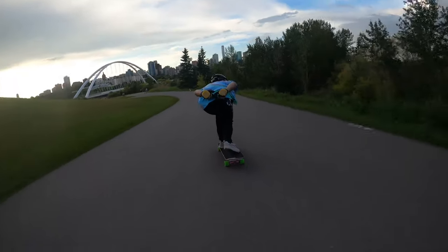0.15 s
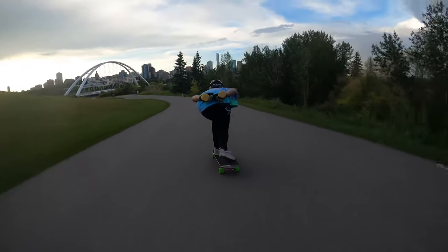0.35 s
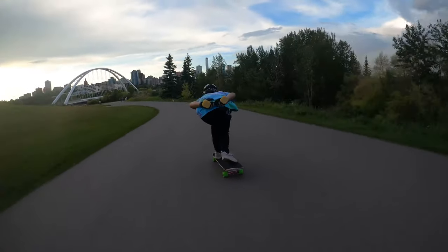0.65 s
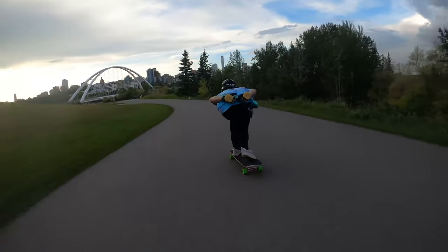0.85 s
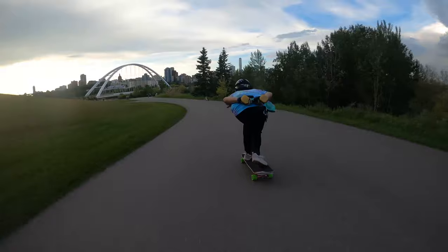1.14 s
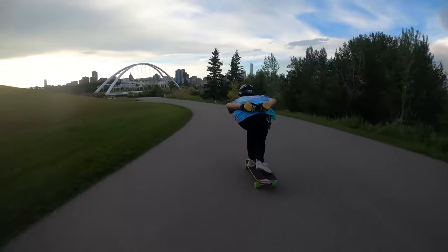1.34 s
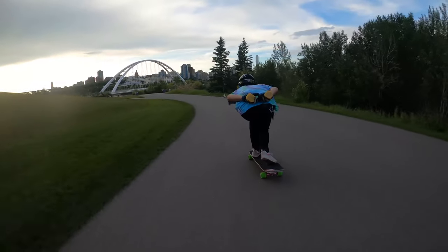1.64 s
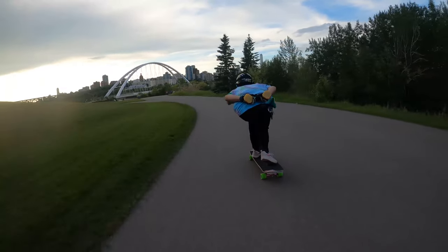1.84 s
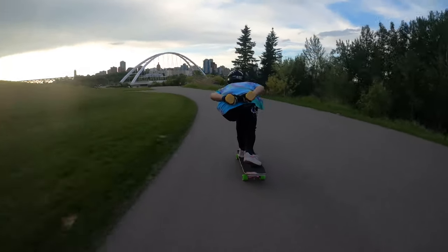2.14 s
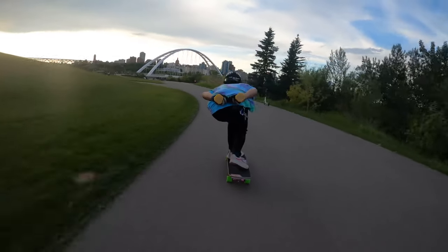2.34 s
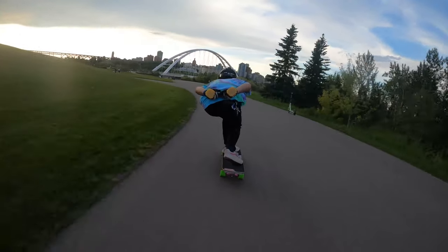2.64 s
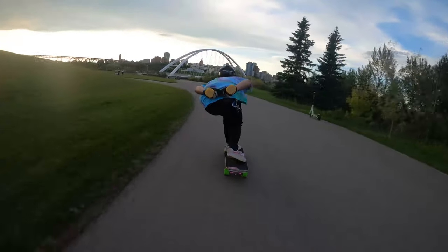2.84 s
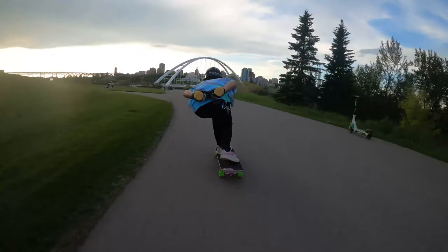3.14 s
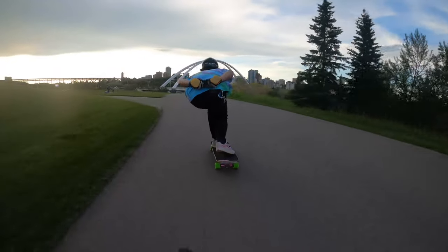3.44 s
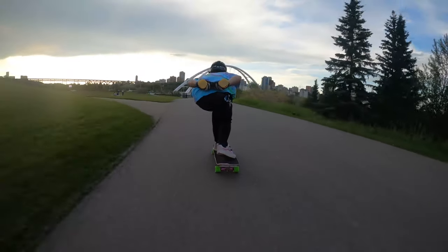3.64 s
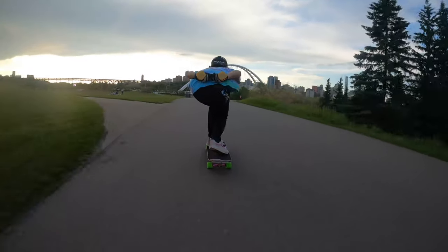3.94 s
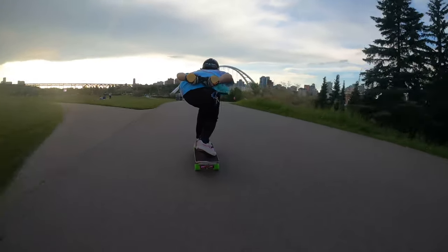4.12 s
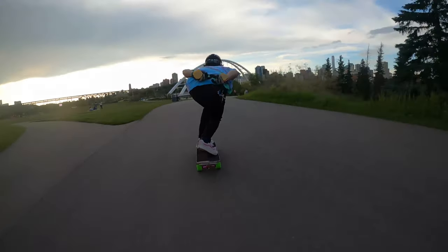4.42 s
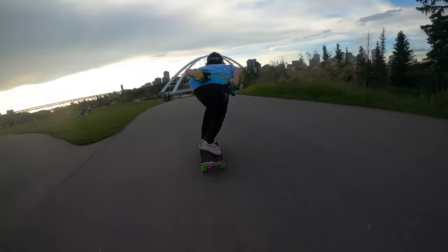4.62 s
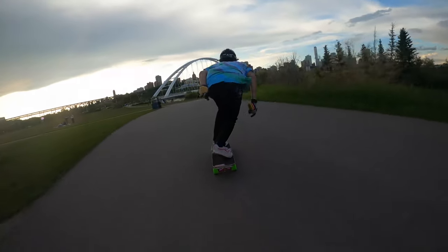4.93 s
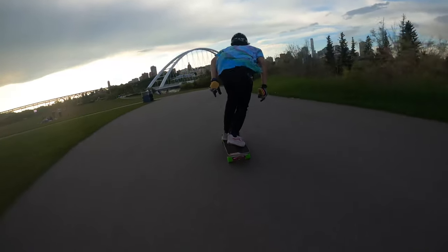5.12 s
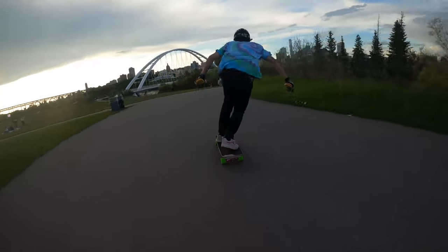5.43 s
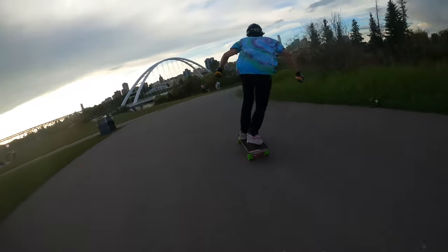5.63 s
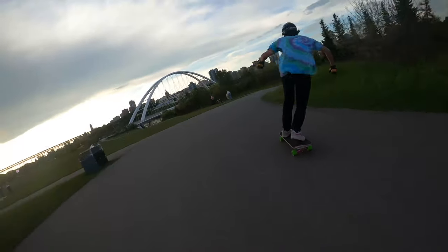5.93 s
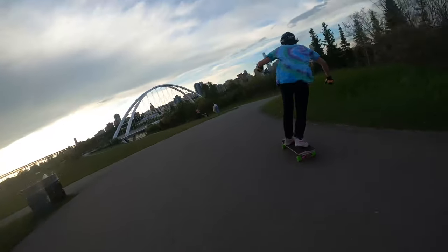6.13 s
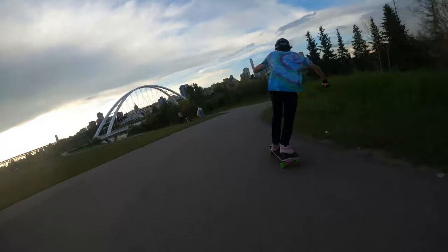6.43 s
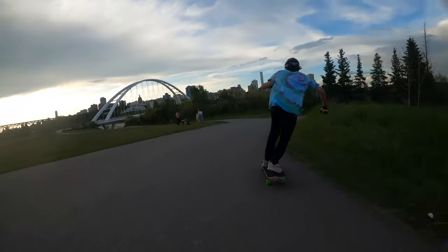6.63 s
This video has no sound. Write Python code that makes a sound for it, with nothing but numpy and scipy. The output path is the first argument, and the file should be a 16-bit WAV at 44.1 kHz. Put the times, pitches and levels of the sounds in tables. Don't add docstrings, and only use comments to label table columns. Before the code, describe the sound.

Longboard wheels drone steadily over asphalt just ahead, with gritty tread hiss and faint sand ticks, while wind thumps and buffets the moving microphone.

```python
import sys
import numpy as np
from scipy import signal
from scipy.fft import rfft, irfft, next_fast_len
from scipy.io import wavfile
from scipy.ndimage import uniform_filter1d, map_coordinates

SR = 44100
rng = np.random.default_rng(int(sys.argv[2]) if len(sys.argv) > 2 else 0)


def int16_out(signal):
    q = np.round(np.clip(np.atleast_2d(signal).T, -1, 1) * 32767)
    wavfile.write(sys.argv[1], SR, q.astype(np.int16))


def boost_factor(decibels):
    exponent = np.asarray(decibels, float) / 20
    return 10 ** exponent


N = 298557
TIME = np.arange(N) / SR


def unit(x):
    return x / np.sqrt(np.mean(x ** 2) + 1e-20)


def along(points, hz):
    point_hz, value = np.transpose(points)
    return np.interp(np.log(hz + 1), np.log(point_hz + 1), value)


def curves(rows):
    seconds, *columns = np.transpose(rows)
    return [np.interp(TIME, seconds, column) for column in columns]


def wobble(rate):
    knots = rng.standard_normal(int(N * rate / SR) + 4)
    return map_coordinates(knots, [np.arange(N) * rate / SR])


def swells(rows, base_db):
    power = boost_factor(base_db) ** 2
    for start, db, half in rows:
        power = power + boost_factor(db) ** 2 * np.exp(-2 * ((TIME - start) / half) ** 2)
    return 10 * np.log10(power)


def filtered(x, response):
    size = next_fast_len(N + 8192)
    spectrum = rfft(x, size) * response(np.fft.rfftfreq(size, 1 / SR))
    return irfft(spectrum, size)[..., :N]


def shape(points):
    return lambda hz: boost_factor(along(points, hz)) * (hz > points[0][0]) * (hz < points[-1][0])


def modes(table):
    def response(hz):
        total = 0
        for k, (centre, width, db) in enumerate(table):
            ring = 1j * hz * width / (centre * centre - hz * hz + 1j * hz * width)
            total = total + (-1) ** k * boost_factor(db) * ring
        return total
    return response


def patchy(patchy_db):
    bins = signal.stft(rng.standard_normal((2, N)), nperseg=512)[2]
    field = uniform_filter1d(rng.standard_normal(bins.shape[1:]), size=6, axis=0)
    field = uniform_filter1d(field, size=10, axis=1)
    return signal.istft(bins * boost_factor(patchy_db * unit(field)), nperseg=512)[1][:, :N]


# frequency in Hz, left over right in dB.
PORT_LEVEL = [(500, 2.5), (1250, 2.2), (1550, .8), (1950, -5), (2250, 3), (2750, 13), (3300, 13), (4200, 0),
              (4900, -9.5), (5600, -3), (5750, 0), (6800, 0), (7100, 11), (8000, 15), (9200, 5), (12500, 0)]
# frequency in Hz, left's lead in radians.
PORT_LEAD = [(0, 0), (1100, .17), (1900, .1), (2280, -1.9), (2550, -1.95), (3100, -1), (3500, .1),
             (4200, .6), (4900, 2.6), (5600, 3.9), (5720, 2 * np.pi)]
# frequency in Hz, coherence from 0 to
PORT_LIKENESS = [(500, 1), (1300, .99), (2100, .8), (2800, .97), (3600, .92), (4300, .6), (4750, .7),
                 (5250, .5), (5600, .6), (5750, .99), (6800, .99), (7050, .55), (8300, .35), (9500, .72),
                 (12500, .98)]


def at_ports(pair, colour):
    def ports(hz):
        spread = np.arccos(np.clip(along(PORT_LIKENESS, hz), 0, 1)) / 2
        half = boost_factor(along(PORT_LEVEL, hz) / 2) * np.exp(.5j * along(PORT_LEAD, hz))
        left = half * np.array([np.cos(spread), np.sin(spread)])
        right = np.array([np.cos(spread), -np.sin(spread)]) / half
        mid = np.sqrt(np.sum(np.abs(left + right) ** 2, axis=0)) / 2
        return np.array([left, right]) * colour(hz) / mid
    both = filtered(pair, ports).sum(axis=1)
    return both / np.std(both.mean(axis=0))


# start in seconds, end in seconds, steady hiss in dB.
GUST_SPELLS = [
    (-.1, 1.15, -37),
    (5.345, 5.825, -33),
]


def crosswind():
    edge_s = .015
    rows = []
    for start, end, _ in GUST_SPELLS:
        rows.append(np.clip(np.minimum(TIME - start, end - TIME) / edge_s + .5, 0, 1))
    return np.array(rows)


# time in seconds, drone in dB, drone centre in Hz, loose grit in dB.
ROLLING = [(0, -22, 1057, 4.5), (.15, -23.5, 1000, 1), (.75, -22.5, 1020, -2.5), (.85, -25.5, 995, 0.5),
           (1.2, -22.5, 1014, 1.5), (1.7, -23, 987, 1.5), (2.3, -23.5, 964, 0.5), (2.9, -20.5, 984, 3.5),
           (3.2, -22.5, 990, -2), (3.45, -22.5, 1040, -0.5), (4.15, -22.5, 1030, -1.5),
           (4.65, -25, 977, -0.5), (4.95, -23, 975, 0), (5.35, -22.5, 1036, -3.5), (5.47, -21, 1000, -2.5),
           (5.84, -23, 1070, 2.5), (6.3, -20, 1046, 1), (6.77, -22.5, 1030, -0.5)]
# frequency in Hz, width in Hz, level in dB.
TYRE_MODES = [(946, 330, 0), (1144, 356, 0)]
# frequency in Hz, width in Hz, level in dB.
DECK_MODES = [(767, 157, -3.5), (1442, 236, -3.5), (1995, 670, -7.5)]
# frequency in Hz, width in Hz, level in dB.
HUM_MODE = [(592, 270, 0)]
# frequency in Hz, level in dB per Hz.
TRUCK_SPECTRUM = [(1350, -39.5), (2300, -25), (2410, -8), (2790, -1), (3300, 2.5), (3720, -4.5),
                  (4300, -19), (5590, -38), (9460, -120)]
# time in seconds, hum in dB, half length in seconds.
ROUGH_STRETCHES = [
    (.7, -35, 0.13),
    (2.35, -32, .12),
    (2.85, -36, .1),
    (4.3, -32, 0.11),
    (5.27, -34.5, 0.12),
    (6.12, -31, 0.12),
    (6.42, -26.5, 0.14),
]


def wheels():
    drone_db, centre_hz, grit_db = curves(ROLLING)
    truck_db = -42 + grit_db - 0.5 * crosswind().sum(axis=0) + 0.51 * wobble(6)
    hum_db = swells(ROUGH_STRETCHES, -36.5) + 1.5 * wobble(5.9)

    def muffle(hz):
        return 1 / (1 + (hz / 2200) ** 8)

    road = patchy(0.35) * boost_factor(0.11 * wobble(25))
    low_ring, high_ring = [at_ports(road, lambda hz: muffle(hz) * np.abs(modes([mode])(hz)) ** 3)
                           for mode in TYRE_MODES]
    high = np.clip((centre_hz - 940) / 150, .12, .88)
    drone = np.sqrt(1 - high) * low_ring + np.sqrt(high) * high_ring
    deck = boost_factor(-12.5) * at_ports(patchy(1.6), lambda hz: muffle(hz) * modes(DECK_MODES)(hz) ** 2)
    hum = at_ports(patchy(3.0), lambda hz: muffle(hz) * modes(HUM_MODE)(hz) ** 2)
    truck = at_ports(patchy(1.3) * boost_factor(0.59 * wobble(60)), shape(TRUCK_SPECTRUM))
    body = boost_factor(drone_db + .6 * wobble(8)) * (0.86 * drone + deck)
    return body + boost_factor(hum_db) * hum + boost_factor(truck_db) * truck


# frequency in Hz, level in dB per Hz.
TREAD_SPECTRUM = [(3600, -15.5), (4000, -2.5), (4400, -1.5), (4900, 0), (5400, -5.5), (5800, -6.5),
                  (6400, -9), (6800, -10.5), (7300, -16), (7850, -19), (8200, -29.5), (8800, -46)]
# frequency in Hz, level in dB per Hz.
SAND_SPECTRUM = [(8000, -6), (8300, 3), (8900, 2), (9500, 2), (10200, 0), (11200, -2), (11700, -6),
                 (12600, -7), (13300, -12), (14200, -18), (15000, -24)]
# time in seconds, level in dB, half length in seconds.
SAND_PATCHES = [
    (0, -74, 0.11),
    (.72, -77, 0.0045),
    (1.9, -81.5, .2),
    (2.7, -79.5, .3),
    (3.4, -71, .005),
    (4.9, -82, .25),
    (5.9, -65, .005),
    (5.95, -76.5, .25),
    (6.3, -71.5, .3),
]


def spray():
    grit_db = curves(ROLLING)[2]
    sag_db = -0.25 * (TIME - 3)
    dull_db = -2.5 * crosswind().sum(axis=0)
    hiss_db = -50 + .2 * grit_db + dull_db + sag_db + 1.2 * wobble(3.3)
    sand_db = swells(SAND_PATCHES, -80.5) + .25 * grit_db
    hiss = at_ports(patchy(0.96) * boost_factor(1.1 * wobble(90)), shape(TREAD_SPECTRUM))
    sand = at_ports(patchy(1.8) * boost_factor(1.6 * wobble(150)), shape(SAND_SPECTRUM))
    return boost_factor(hiss_db) * hiss + boost_factor(sand_db) * sand


# time in seconds, strength in dB, yaw as left over right in dB,
# slow push on the housing in dB.
HEADWIND = [(0, -24, 0.5, -17), (.3, -26.5, -4.5, -15.5), (.75, -28.5, -4.5, -20), (1.15, -29, 0, -20),
            (1.5, -28, 7, -16.5), (1.9, -28.5, 4, -17), (2.3, -24.5, 4.5, -18.5), (2.76, -30.5, 4, -16.5),
            (3.2, -28.5, 0, -17), (4.0, -34.5, 2, -19), (4.35, -25.5, 1, -18.5), (4.6, -30.5, 2.5, -19),
            (5.05, -31, -0.5, -18), (5.33, -25.5, -7, -17.5), (5.8, -25, -0.5, -20.5),
            (5.9, -32.5, 0.5, -24), (6.38, -30.5, 2, -20), (6.77, -24.5, 3.5, -18)]
# time in seconds, left in dB, right in dB,
# half length in seconds.
BIG_EDDIES = [(0.196, -30, -24.5, 0.045), (0.372, -26, -29, 0.027), (0.875, -19.5, -25, 0.03),
              (0.967, -21, -23, 0.017), (1.091, -23.5, -25.5, .025), (1.364, -35, -29, 0.025),
              (1.724, -24, -30, .04), (2.052, -23, -28.5, .03), (2.469, -19, -28, 0.056),
              (2.628, -24.5, -25, 0.024), (2.887, -21.5, -27, 0.053), (3.051, -21.5, -35, 0.017),
              (3.128, -17.5, -27, .025), (3.191, -24.5, -22, .03), (3.356, -22.5, -25.5, 0.054),
              (3.463, -16.5, -20.5, 0.016), (3.52, -29, -17.5, 0.016), (3.601, -23, -20.5, 0.03),
              (3.698, -18.5, -21, 0.028), (3.791, -22, -23, 0.024), (3.861, -19.5, -27, 0.022),
              (3.954, -23, -27, 0.027), (4.078, -20.5, -26.5, 0.023), (4.194, -18.5, -28.5, 0.025),
              (4.255, -28, -16.5, 0.013), (4.326, -17, -21, .025), (4.426, -22, -20.5, 0.063),
              (4.6, -30, -24, 0.035), (4.823, -20.5, -31, .03), (4.983, -23, -27, 0.016)]
# time in seconds, level in dB, half length in seconds.
SIDE_PUFFS = [(0.05, -40, 0.013), (.14, -36, .04), (.24, -32, .025), (0.35, -33, .02), (0.415, -31, 0.01),
              (.505, -28.5, 0.033), (0.592, -35, 0.039), (0.666, -27, 0.028), (0.762, -27.5, 0.021),
              (.885, -31, .03), (1, -35, 0.016), (1.104, -32.5, 0.013), (2.584, -34.5, 0.033),
              (3.476, -36.5, 0.024), (3.588, -36, 0.024), (3.793, -37, 0.013), (3.98, -31, 0.011),
              (4.725, -28.5, 0.018), (5.004, -31, 0.022), (5.116, -34.5, 0.022), (5.28, -34, .04),
              (5.4, -38, .03), (5.51, -31.5, 0.053), (5.65, -34.5, .04), (5.772, -32, 0.046),
              (6.49, -35, .02)]
# frequency in Hz, level in dB per Hz.
RUMBLE_SPECTRUM = [(7.1, -36), (12, -17), (43, 3), (160, -9.5), (210, -24.5), (350, -120)]
# frequency in Hz, level in dB per Hz.
BUFFET_SPECTRUM = [(60, -10.5), (110, -1), (160, -3), (240, -6), (320, -15.5), (450, -26)]
# frequency in Hz, level in dB per Hz.
FLUTTER_SPECTRUM = [(170, -42.5), (270, 1), (350, -0.5), (500, -3.5), (750, -10.5), (1100, -14),
                    (1800, -66)]


def wind():
    strength_db, yaw_db, push_db = curves(HEADWIND)
    left_hits = [(s, left, half) for s, left, _, half in BIG_EDDIES]
    right_hits = [(s, right, half) for s, _, right, half in BIG_EDDIES]
    right_hits += [(s, db + 7, half) for s, db, half in SIDE_PUFFS]
    left_db = swells(left_hits, strength_db + yaw_db / 2 + 2.3 * wobble(15))
    right_db = swells(right_hits, strength_db - yaw_db / 2 + 1.7 * wobble(14))
    slap_db = np.array([left_db, right_db]) + [[1.2], [2.5]]

    rumble_db = push_db + .15 * (slap_db.mean(axis=0) - strength_db - 6) + wobble(9)
    lean_db = .4 * (left_db - right_db) + yaw_db + 2 * wobble(8) + 0.37
    lean = boost_factor(1.8 * lean_db * np.array([[.5], [-.5]]))
    rumble = unit(filtered(rng.standard_normal((2, N)), shape(RUMBLE_SPECTRUM)))
    rumble = rumble * lean / np.sqrt(np.mean(lean ** 2, axis=0))

    ripple = boost_factor(1.3 * np.array([wobble(30), wobble(30)]))
    buffet = unit(ripple * filtered(patchy(0.86), shape(BUFFET_SPECTRUM)))
    flutter = unit(ripple * filtered(patchy(0.38), shape(FLUTTER_SPECTRUM)))
    flutter_db = np.array([[.15], [.25]]) * (slap_db + 21.0) - [[6.5], [4.5]]
    ports = boost_factor(rumble_db) * rumble + boost_factor(slap_db + 2.0) * (buffet + flutter * boost_factor(flutter_db))
    return 0.94 * (ports + 0.61 * ports[::-1])


# frequency in Hz, level in dB per Hz.
GUST_SPECTRUM = [(700, 6), (1300, 12.5), (1600, 3.5), (2050, 2), (2250, -7.5), (2450, -10), (3000, -35)]


def side_gust():
    calm_db = -47
    over_calm_db = (np.array(GUST_SPELLS)[:, 2] - calm_db) @ crosswind()
    gust_db = swells(SIDE_PUFFS, calm_db + over_calm_db + wobble(30))
    hiss = filtered(rng.standard_normal(N), shape(GUST_SPECTRUM))
    hiss = unit(boost_factor(2 * wobble(90)) * hiss)
    over_wheels = np.clip((gust_db + 40.0) / 5, 0, 1)
    return over_wheels * boost_factor(gust_db + 4.0) * hiss * boost_factor([[-1.2], [1.2]])


def scene():
    return wheels() + spray() + wind() + side_gust()


def low_pass(x):
    return signal.sosfilt(signal.butter(12, 14800, fs=SR, output="sos"), x)


def record(dry):
    ceiling, fade_s = .85, .004
    soft = dry / (1 + np.abs(dry / ceiling) ** 4) ** (1 / 4)
    to_end = np.minimum(np.arange(N), np.arange(N)[::-1])
    ends = np.clip(to_end / (fade_s * SR) + .8, 0, 1)
    return low_pass(soft * ends)


dry = scene()
out = record(dry)
int16_out(out)
```